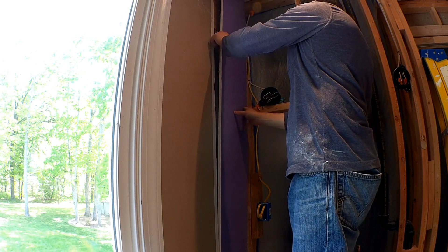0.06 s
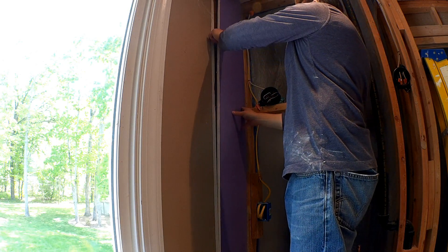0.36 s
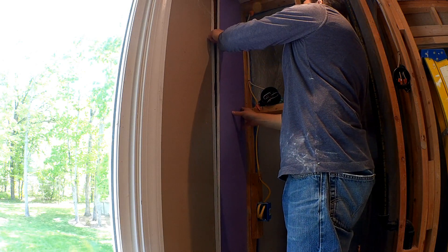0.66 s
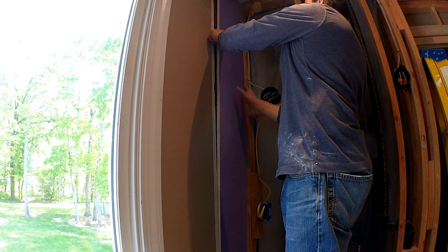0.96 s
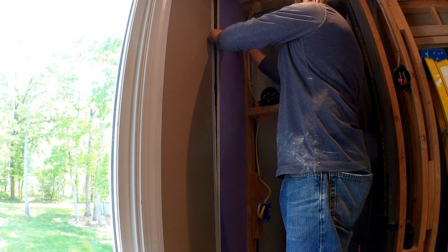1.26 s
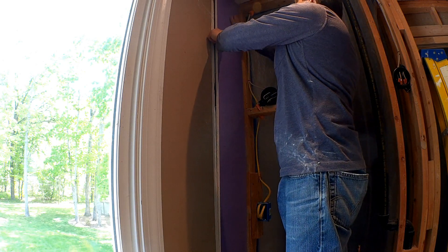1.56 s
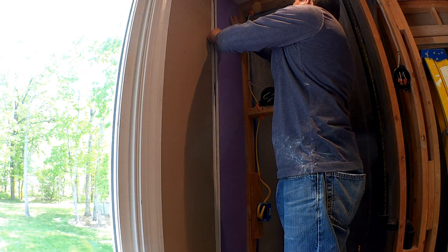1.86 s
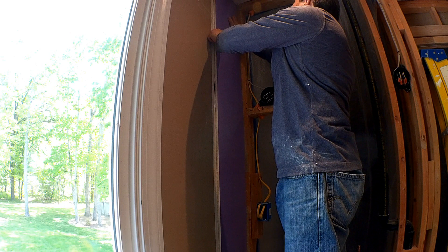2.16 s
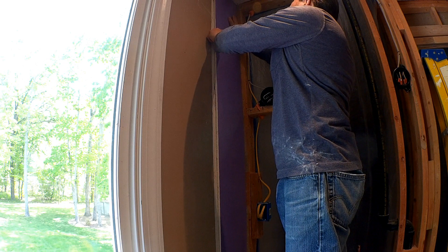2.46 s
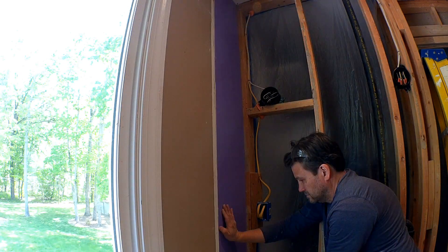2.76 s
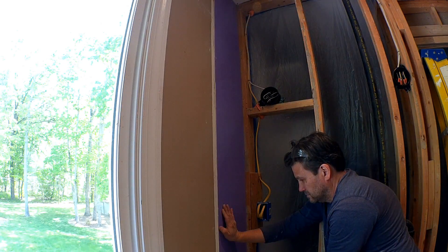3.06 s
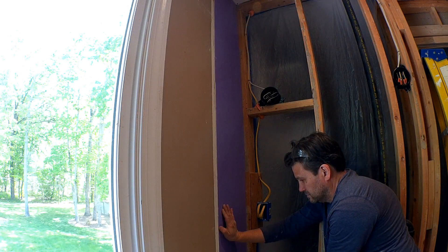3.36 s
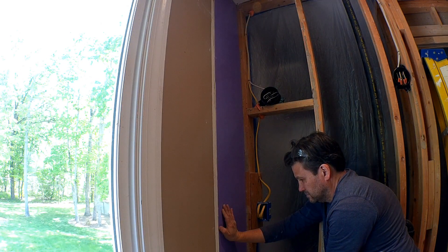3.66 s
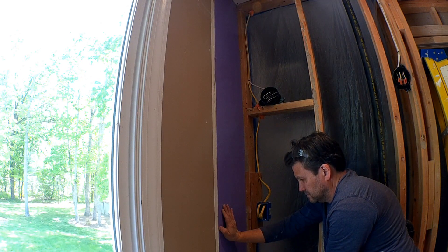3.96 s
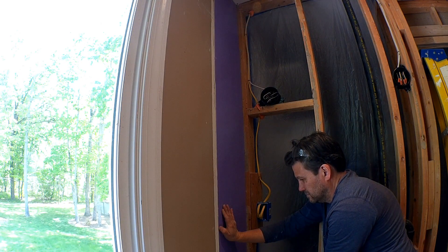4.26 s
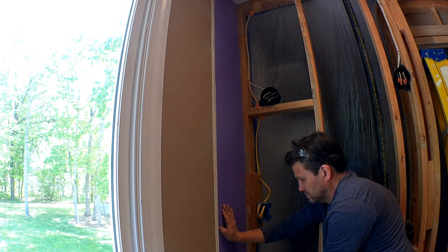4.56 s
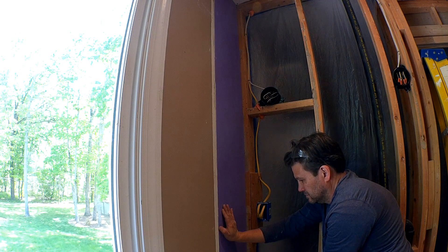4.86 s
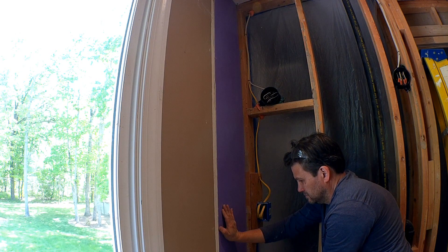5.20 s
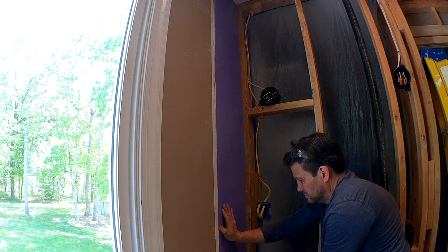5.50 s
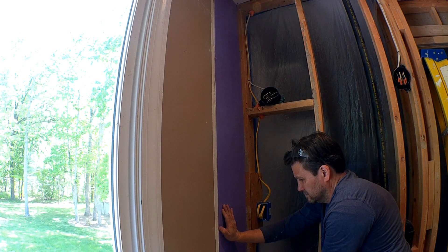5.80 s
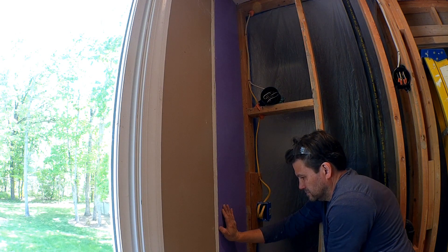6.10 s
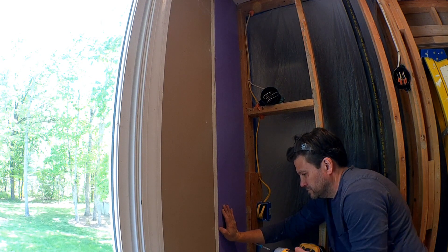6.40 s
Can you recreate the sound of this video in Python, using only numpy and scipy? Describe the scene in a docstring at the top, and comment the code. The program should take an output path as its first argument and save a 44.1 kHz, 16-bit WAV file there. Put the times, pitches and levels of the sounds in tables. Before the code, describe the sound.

A hand rasp trims the edge of a drywall sheet close to the microphone, slightly to the right, in a small room with short echoes. First come a faint clink, papery rubbing, small taps and several thuds as the sheet bumps its framing. Then seven evenly paced, crunchy strokes grow louder, the last two harsh enough to shake the board. A tap and soft sliding close things out over quiet room air.

```python
"""Rasping drywall

The edge of a drywall sheet is trimmed with a hand rasp in a small, half-framed room. First the sheet is
rubbed and knocked against the studs; then come seven strokes that build in force: the rasp lands, its
teeth rip through the gypsum with a faint pitch, and the board drums along. The hardest strokes overload
the microphone."""
import sys
import numpy as np
from scipy import signal
from scipy.fft import rfft, irfft, next_fast_len
from scipy.io import wavfile

SR = 44100
rng = np.random.default_rng(int(sys.argv[2]) if len(sys.argv) > 2 else 0)


def wav_out(sig):
    """Save sig, one row per channel (or a flat mono array), as 16-bit PCM at SR to the path in sys.argv[1]."""
    wavfile.write(sys.argv[1], SR, np.round(np.clip(np.atleast_2d(sig).T, -1, 1) * 32767).astype(np.int16))


N = 292779
TIME = np.arange(N) / SR
SIZE = next_fast_len(N + SR, True)
FREQS = np.maximum(np.arange(SIZE // 2 + 1) * SR / SIZE, 1)

# rasp strokes: (landing time [s], landing level [dB], fastest moment [s], half length [s], grit [dB],
# board drumming [dB], top tooth rate [Hz], tooth pitch against grit [dB])
STROKES = [ (3.385, -36.5, 3.483, .056, -18.8, -41.5, 1050, -12),
           (3.741, -30, 3.814, .058, -22.8, -41.5, 1130, -14),
           (4.024, -20.5, 4.115, .060, -13.3, -40, 1080, -12),
           (4.411, -17, 4.506, .060, -12, -37, 1100, -6.5),
           (4.781, -16.5, 4.881, .058, -9.7, -35, 1060, -1),
           (5.139, -14, 5.250, .065, -5.7, -32.5, 1200, 2.5),
           (5.621, -18, 5.706, .053, -8.5, -32, 1134, -2), ]
# tone colour of a hard crack: (frequency [Hz], level [dB])
CRACK_SPECTRUM = [(30, -60), (100, -22), (400, -3.5), (900, -3.5), (1600, 4), (2400, 3), (4500, 6),
                  (5700, -20), (7600, -16), (11500, -24), (16000, -65)]
# tone colour of a bright tick: (frequency [Hz], level [dB])
TICK_SPECTRUM = [(300, -57.5), (2500, -33.5), (5000, -9.5), (7000, 0), (10000, -4.5), (12500, -14.5),
                 (14000, -42.5), (16000, -69)]


def from_db(db):
    """Decibels to gain."""
    return 10 ** (np.asarray(db) / 20)


def unit_power(x):
    """Scale to unit power."""
    return x / np.sqrt(np.mean(x ** 2) + 1e-20)


def over_hz(points):
    """Join (Hz, value) points on a log-frequency axis."""
    hz, value = np.transpose(points)
    return np.interp(np.log(FREQS), np.log(hz), value)


def drift(rate_hz):
    """Smooth random wobble with a spread of 1."""
    knots = rng.standard_normal(N // 8)
    return np.interp(TIME * rate_hz, np.arange(len(knots)), knots) / np.sqrt(2 / 3)


def colour(x, spectrum, lift_db=0):
    """Minimum-phase EQ that keeps the power of white noise."""
    cepstrum = irfft(np.log(unit_power(from_db(over_hz(spectrum) + lift_db))), SIZE)
    cepstrum[1:SIZE // 2] *= 2
    cepstrum[SIZE // 2 + 1:] = 0
    return irfft(rfft(x, SIZE) * np.exp(rfft(cepstrum)), SIZE)[..., :N]


def narrow_noise(hz, width_hz):
    """Noise ringing in one resonance, at unit power."""
    r = np.exp(-np.pi * width_hz / SR)
    feedforward = np.sqrt((1 - r * r) / 2) * np.array([1, 0, -1])
    feedback = [1, -2 * r * np.cos(2 * np.pi * hz / SR), r * r]
    return signal.lfilter(feedforward, feedback, rng.standard_normal(N))


def stereo(mid, side, likeness):
    """Left and right from two unrelated signals, as alike as the table says."""
    alike = np.clip(over_hz(likeness), -.99, .99)
    common = np.sqrt((1 + alike) / 2) * rfft(mid, SIZE)
    opposed = np.sqrt((1 - alike) / 2) * rfft(side, SIZE) * [[1], [-1]]
    return irfft(common + opposed, SIZE)[:, :N]


def grains(per_s, spread_db):
    """Crumbs break at random, a few much larger than the rest; mid and side streams."""
    sizes = from_db(spread_db * np.minimum(rng.exponential(1, (2, N)), 4))
    signs = rng.choice([-1, 1], (2, N))
    return unit_power(sizes * signs * (rng.random((2, N)) < per_s / SR))


def bursts(times, peak_db, t60):
    """Noise bursts that start at once and die away."""
    kicks = np.zeros(N)
    kicks[np.round(np.asarray(times) * SR).astype(int)] = from_db(peak_db)
    envelope = signal.lfilter([1], [1, -from_db(-60 / (t60 * SR))], kicks + 1e-18)
    return envelope * rng.standard_normal((2, N))


def push(start, length, db, change_db, attack_s, release_db_per_s):
    """Envelope of one push: a quick attack, a hold that swells or sags, a release."""
    age = TIME - start
    attack = np.clip(1 + age / attack_s, 0, 1) ** 2
    held_db = db + change_db * np.clip(age / length, 0, 1)
    return attack * from_db(held_db - release_db_per_s * np.maximum(age - length, 0))


def room_tone(air_db=-58.5, whine_db=-69.5):
    """A bed of soft air with a faint hum and whine."""
    # tone colour of the air: (frequency [Hz], level [dB])
    air_spectrum = [(25, -39), (41, -26), (102, -10.5), (200, -8.5), (290, -7), (480, -11), (780, -10.5),
                    (1730, -13), (2770, -18), (4400, -24), (5820, -32), (7460, -24.5), (10500, -25.5),
                    (13000, -36.5), (15000, -42), (18000, -70)]
    # stereo image of the air: (frequency [Hz], left-right likeness [0-1])
    air_likeness = [(60, 0.6), (300, 0.71), (3000, 0.23), (7000, 0)]
    # bands of the hum: (frequency [Hz], width [Hz], level [dB])
    hum_bands = [(110, 6.4, -71.5), (174, 13, -66), (1120, 14, -81.5)]
    air = from_db(air_db) * stereo(*colour(rng.standard_normal((2, N)), air_spectrum), air_likeness)
    hum = sum(from_db(db) * narrow_noise(hz, width) for hz, width, db in hum_bands)
    whine = from_db(whine_db) * narrow_noise(hz=2750, width_hz=60)
    return air + hum + whine


def echoes(early_db=-5, early_t60=0.12, late_db=-13, late_t60=0.23, wall_hz=5000):
    """Dense echoes from the near wall and studs, then a short, duller tail."""
    t = TIME[:SR // 2]
    early, late = rng.standard_normal((2, 2, len(t))) * (t > .0015)
    early = early * from_db(-60 * t / early_t60)
    late = signal.sosfilt(signal.butter(1, wall_hz, fs=SR, output="sos"), late)
    late *= from_db(-60 * t / late_t60)
    return (from_db(early_db) * unit_power(early) + from_db(late_db) * unit_power(late)) / np.sqrt(len(t))


def room(x, patterns=4):
    """The point of contact travels along the edge, so the pattern of echoes keeps changing."""
    shares = np.array([drift(14) for _ in range(patterns)])
    shares /= np.sqrt(np.sum(shares ** 2, axis=0))
    return x + sum(signal.fftconvolve(x * share, echoes(), axes=1)[:, :N] for share in shares)


def squeak(top_hz=7300, top_s=3.213, arch_s=0.074):
    """A thin squeak: a near sine whose pitch arches up and over."""
    hz = top_hz * np.exp(-((TIME - top_s) / arch_s) ** 2)
    phase = 2 * np.pi * np.cumsum(hz * (1 + .006 * drift(900))) / SR
    gain = push(start=3.187, length=.042, db=-44, change_db=-2, attack_s=.008, release_db_per_s=4000)
    return np.sqrt(2) * gain * np.array([np.sin(phase), np.cos(phase)])


def clink(start_s=0.034, body_db=-35, bright_db=-33):
    """Thin steel rattles briefly and rings on."""
    # ring of the steel: (frequency [Hz], level [dB], t60 [s])
    modes = [(6450, -46, 0.27), (6950, -34, 0.11), (7280, -43, 0.16)]
    age = np.maximum(TIME - start_s, 0)
    ring = sum(from_db(db - 60 * age / t60) * np.sin(2 * np.pi * hz * age) for hz, db, t60 in modes)
    rattle = bursts([start_s], 0, t60=0.17)
    body = from_db(body_db) * colour(rattle, CRACK_SPECTRUM)
    return ring + body + from_db(bright_db) * colour(rattle, TICK_SPECTRUM)


def board(force, spectrum):
    """The sheet answers with a few clear modes among many overlapping ones."""
    # ring of the board: (frequency [Hz], width [Hz], lift [dB])
    modes = [(178, 28, 4.5), (235.6, 16, 5.5), (319.6, 26, 6.5), (553, 26, 5.5), (693, 22, 5), (935, 24, 6),
             (1210, 24, 4)]
    lift_db = sum(db / (1 + (2 * (FREQS - hz) / width) ** 2) for hz, width, db in modes)
    return colour(force, spectrum, lift_db)


def rubs(level_db=-2):
    """The paper face slides under the hands with a fine-grained hiss."""
    # slides: (time [s], length [s], level [dB], swell [dB])
    slides = [(0.0, .02, -53, -5), (0.196, 0.11, -42, -6.5), (0.402, 0.043, -48, 3.5),
              (0.596, .015, -53, 0), (0.68, .03, -53.5, -4), (0.847, .03, -54, -0.5), (1.311, .16, -58, 0),
              (1.495, 0.057, -30, -1.5), (1.652, 0.032, -50, 3), (1.79, .035, -35.5, -9),
              (1.84, 0.088, -52.5, -4), (1.974, .128, -41.5, 4), (2.27, 0.2, -54.5, -4),
              (3.138, .12, -53.5, 6.5), (5.923, 0.039, -46, -1), (6.087, 0.2, -55.5, -1),
              (6.33, 0.29, -53.5, -.5)]
    # tone colour of rubbed paper: (frequency [Hz], level [dB])
    paper_spectrum = [(30, -46), (150, -5.5), (500, -4), (1500, -3.5), (2700, -2), (4200, 0.5),
                      (5700, -20.5), (7500, -18), (11000, -28.5), (15000, -46.5)]
    sliding = sum(push(*row, attack_s=0.011, release_db_per_s=450) for row in slides)
    return from_db(level_db) * colour(grains(per_s=5500, spread_db=2.5) * sliding, paper_spectrum)


def knocks():
    """The sheet hits the studs with a crack and a thud; a firm push also sways it on its frame."""
    # hits: (time [s], crack [dB], thud [dB], sway [dB])
    hits = [(1.492, -33, -26, -40), (1.526, -19, -34, -55), (2.077, -50, -31, -56), (2.101, -24, -39, -50),
            (3.015, -55, -32, -40), (3.359, -13.5, -21, -20.5), (4.972, -59, -27, -62),
            (6.332, -59.5, -48, -49)]
    # hollow body of the thud: (frequency [Hz], level [dB])
    thud_spectrum = [(25, -58.5), (90, -15), (150, -4.5), (250, 2.5), (330, 0.5), (420, -11.5), (600, -12),
                     (850, -7), (1400, -20), (3000, -41), (12000, -90)]
    # low end of the swaying sheet: (frequency [Hz], level [dB])
    sway_spectrum = [(25, -44), (45, -19), (65, -1), (100, 1), (190, 5.5), (320, -12.5), (700, -18.5),
                     (2000, -49.5), (10000, -95)]
    times, crack_db, thud_db, sway_db = np.transpose(hits)
    cracks = colour(bursts(times, crack_db, t60=0.056), CRACK_SPECTRUM)
    thuds = board(bursts(times, thud_db, t60=.085), thud_spectrum)
    sway = colour(bursts(times, sway_db, t60=0.13), sway_spectrum)
    return cracks + thuds + sway


def taps(landing_treble_db=-22):
    """The tool ticks on the sheet's edge; at each stroke it catches twice, then lands."""
    # light taps: (time [s], peak [dB], treble against the peak [dB])
    light_taps = [(1.792, -42, -19), (1.974, -41, -13), (2.497, -33, -10), (2.799, -40.5, -35),
                  (2.915, -46, -28), (3.018, -32.5, -45), (3.139, -39, -18), (3.229, -35.5, -10),
                  (3.251, -35.5, -22), (3.265, -37, -22), (5.934, -24.5, -12.5)]
    # first teeth catching: (time before the landing [s], peak [dB])
    first_teeth = [(.025, -39.5), (.013, -34.5)]
    # body of a tap: (frequency [Hz], level [dB])
    tap_spectrum = [(30, -43.5), (100, -26), (400, -13), (1300, -6.5), (2500, -4), (3050, 4), (3600, -7),
                    (4500, -5), (5600, -24), (9000, -33), (13000, -44), (16000, -75.5)]
    landings = [(s, db, landing_treble_db) for s, db, *_ in STROKES]
    catches = [(s - ahead, db, treble) for s, _, treble in landings for ahead, db in first_teeth]
    times, peak_db, treble_db = np.transpose(list(light_taps) + landings + catches)
    body = colour(bursts(times, peak_db, t60=0.03), tap_spectrum)
    ticks = colour(bursts(times, peak_db + treble_db, t60=0.017), TICK_SPECTRUM)
    return body + ticks


def arm_swings(rise_db=9, fall_db=11, flatness=2.6, drum_fade_db_per_s=350, lag_s=.012, arch_s=.085):
    """Cutting, drumming, tooth rate and evenness: the arm speeds up and slows down in every stroke."""
    cutting, drumming, tooth_hz, evenness = np.zeros((4, N))
    for lands, _, fastest, half, grit_db, drum_db, top_hz, pitch_db in STROKES:
        t, landed = TIME - fastest, TIME >= lands
        swing = from_db(-np.where(t < 0, rise_db, fall_db) * abs(t / half) ** flatness)
        drag = from_db(-10 - 100 * abs(t)) * (t < 0)  # light drag grows from the landing into the swing
        cutting += landed * from_db(grit_db) * np.maximum(swing, drag)
        drumming += landed * from_db(drum_db - drum_fade_db_per_s * np.maximum(t - 1.5 * half, 0))
        arch = np.exp(-((t - lag_s) / arch_s) ** 2)
        tooth_hz = np.where(landed, top_hz * (.4 + .6 * arch), tooth_hz)
        settle_db = np.minimum(110 * t, 4.5)  # the teeth run more evenly as the stroke goes on
        evenness = np.where(landed, from_db(pitch_db + settle_db), evenness)
    return cutting, drumming, tooth_hz, evenness


def rasp(level_db=-1, chatter_db=2.0, bite=0.76, jitter=.04, wander=.02, uneven_above_db=-18):
    """Each row of teeth tears off a puff of crumbs; uneven grip makes the stroke chatter."""
    # the rasp binds and shakes the board: (time [s], length [s], drumming [dB], swell [dB])
    binds = [(3.518, .012, -30.5, 0), (3.856, .018, -34.5, -1), (4.093, 0.0074, -33.5, 0),
             (4.156, .018, -31, 1), (4.533, .018, -32, 0), (4.907, .018, -30.5, 0),
             (5.256, .056, -11.5, -1), (5.663, .088, -15.5, 0.5), (5.76, .03, -23, -6)]
    # teeth snag in the gypsum: (time [s], peak [dB])
    snag_hits = [(3.468, -20), (3.516, -15.5), (3.756, -27), (3.815, -18.5), (3.849, -19.5), (4.085, -20),
                 (4.458, -14), (4.547, -9.5), (4.860, -17), (4.902, -4.5), (5.257, -1), (5.272, 0.5),
                 (5.303, -0.5), (5.669, -6), (5.691, 1), (5.723, 1), (5.753, -3)]
    # harmonics of the tooth pitch, fundamental first: (level [dB])
    harmonics_db = [-2.5, -.5, -1.5, -9]
    # tone colour of tearing gypsum: (frequency [Hz], level [dB])
    grit_spectrum = [(30, -51), (200, -24), (600, -15), (1000, -8), (1450, -7), (2000, -0.5), (3100, 1.5),
                     (4600, -1.5), (5700, -14.5), (7300, -6.5), (9800, -12), (12000, -18), (13500, -48.5),
                     (16000, -81.5)]
    # tone colour of the drumming board: (frequency [Hz], level [dB])
    drum_spectrum = [(25, -26), (70, -11.5), (140, -9), (235, 0.5), (330, -1), (430, -7), (560, -0.5),
                     (900, -1), (1400, -1.5), (3000, -34.5), (14000, -75)]
    cutting, drumming, tooth_hz, evenness = arm_swings()
    binding = sum(push(*row, attack_s=0.0071, release_db_per_s=700) for row in binds)
    evenness /= 1 + (binding / from_db(uneven_above_db)) ** 2
    phase = 2 * np.pi * np.cumsum(tooth_hz * (1 + jitter * drift(500) + wander * drift(60))) / SR
    grip = from_db(chatter_db * drift(240))
    crumbs = grains(per_s=11000, spread_db=3.0) * (1 + bite * np.cos(phase))
    # when the teeth run evenly, the power of the stroke passes from the grit into the pitch
    effort = from_db(level_db) * grip * cutting / np.sqrt(1 + evenness ** 2)
    grit = colour(crumbs * effort, grit_spectrum)
    partials = [from_db(db + 3.5 * drift(90)) * np.cos(k * phase) for k, db in enumerate(harmonics_db, 1)]
    fundamental = partials[0] * np.minimum(evenness, 1)  # only speaks once the teeth bite evenly
    tone = (fundamental + sum(partials[1:])) * evenness * effort * [[1], [0]]  # mid only
    drum = board(crumbs * grip * np.hypot(drumming, binding), drum_spectrum)
    snags = colour(bursts(*np.transpose(snag_hits), t60=0.076), grit_spectrum)
    return grit + tone + drum + snags


def scene(work_db=-3.5):
    """The work is to the right; the recorder's body shades and delays it differently at each port."""
    # stereo image of the work: (frequency [Hz], left-right likeness [0-1])
    likeness = [(60, 1), (600, 1), (3000, 1), (4800, 0.99), (6500, 0), (15000, 1)]
    # shading at the microphone ports: (frequency [Hz], left minus right [dB])
    balance = [(60, -3.5), (350, -7), (1200, -5.5), (2700, -2.5), (4200, -5.5), (5400, -8), (6400, 12.5),
               (7800, 11.5), (9800, 9.5), (11500, -2)]
    # how far the left port leads: (frequency [Hz], phase [rad])
    left_lead = [(100, -0.5), (1000, 0.22), (4000, 0.82), (5500, 1.5), (6300, 2.5), (7200, .7), (9300, -1),
                 (11600, 1.1)]
    mid, side = room(rasp() + rubs() + knocks() + taps() + clink() + squeak())
    work = stereo(mid, side, likeness)
    shade = from_db(over_hz(balance) / 2 * [[1], [-1]])
    delay = np.exp(-1j * over_hz(left_lead) * [[0], [1]])
    at_ports = irfft(rfft(work, SIZE) * shade * delay, SIZE)[:, :N]
    return from_db(work_db) * at_ports + room_tone()


def record(dry, ceiling=.97, cutoff_hz=19500):
    """The hardest strokes clip near full scale; the very top of the treble is cut."""
    clipped = np.clip(dry, -ceiling, ceiling)
    return signal.sosfilt(signal.cheby2(12, 70, cutoff_hz, fs=SR, output="sos"), clipped)


dry = scene()
out = record(dry)
wav_out(out)
```